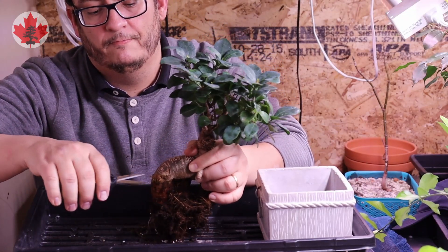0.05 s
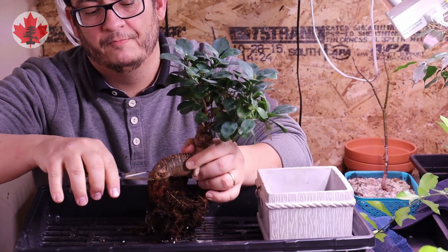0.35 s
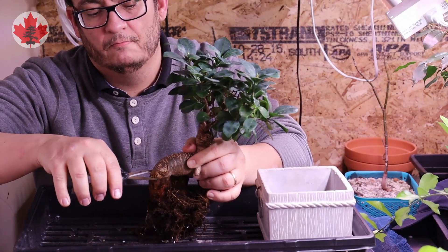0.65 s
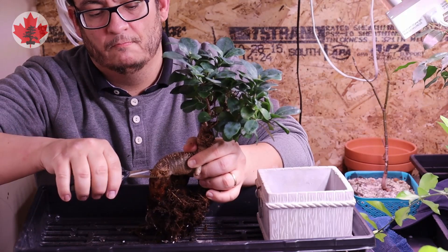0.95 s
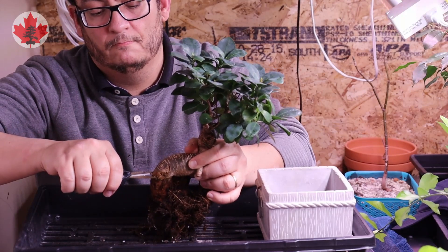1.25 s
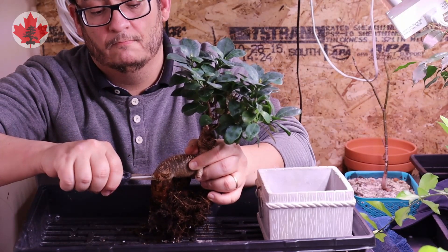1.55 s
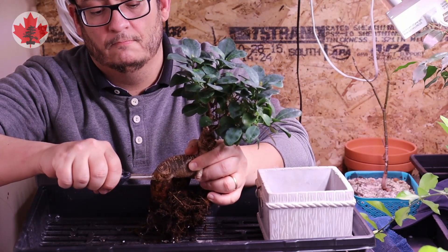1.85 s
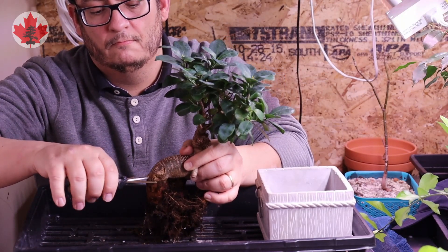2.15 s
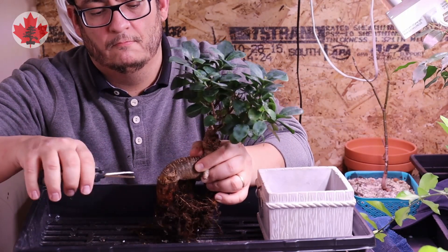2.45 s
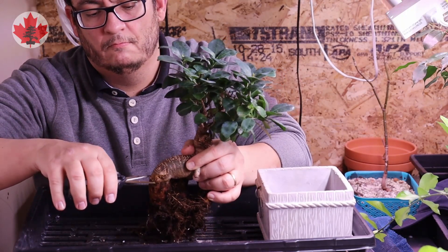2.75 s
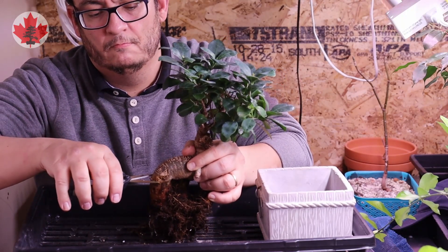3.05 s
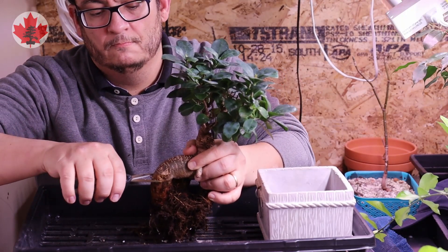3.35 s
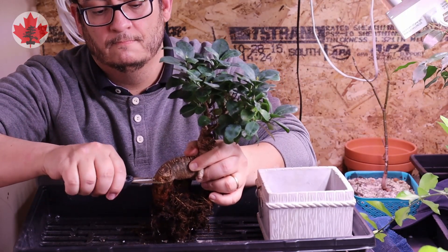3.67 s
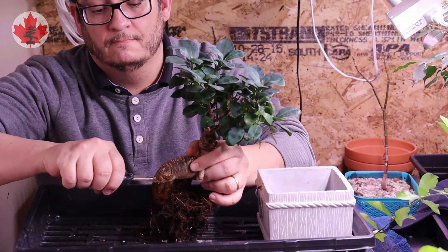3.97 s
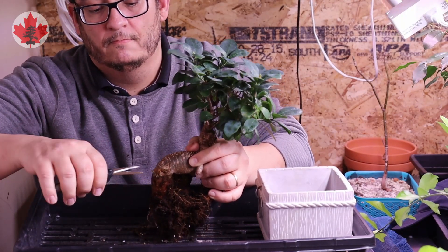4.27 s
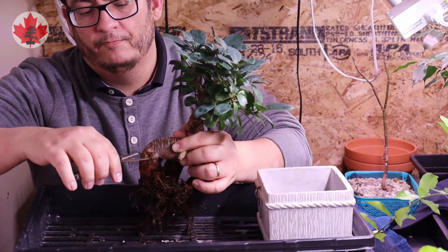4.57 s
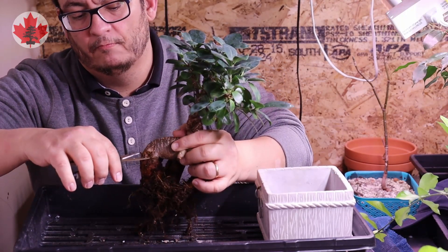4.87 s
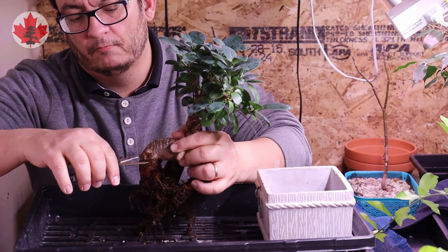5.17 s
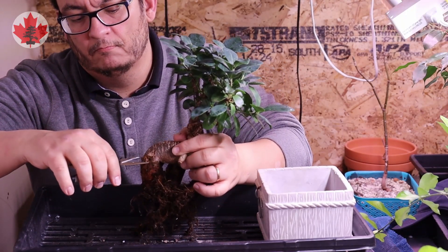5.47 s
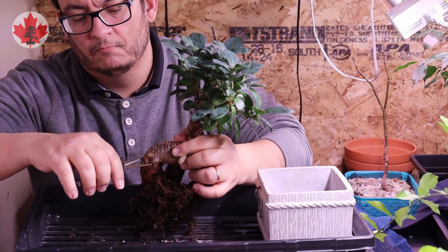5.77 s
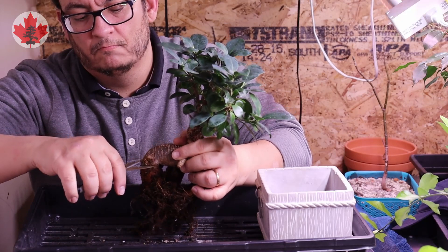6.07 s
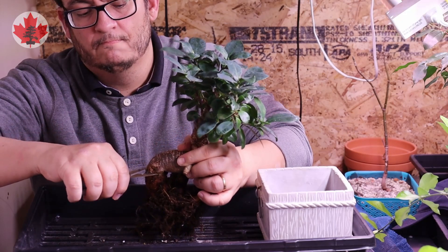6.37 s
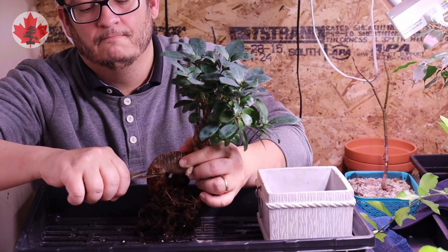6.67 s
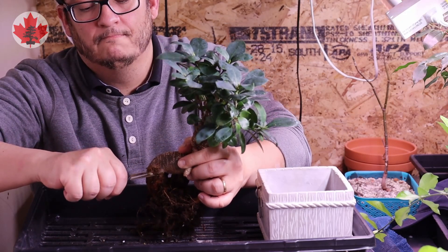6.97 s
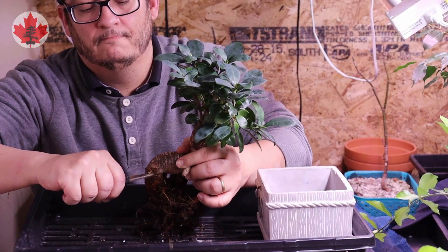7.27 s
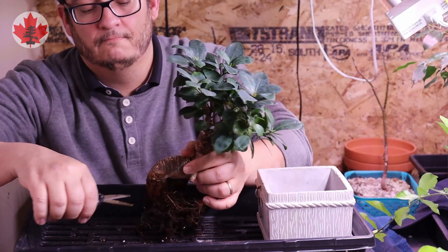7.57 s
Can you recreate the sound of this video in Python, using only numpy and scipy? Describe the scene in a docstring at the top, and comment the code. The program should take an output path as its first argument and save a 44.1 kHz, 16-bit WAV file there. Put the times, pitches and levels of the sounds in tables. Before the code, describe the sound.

A faint mains hum and soft hiss run throughout in a small room. Close by, small steel cutters bite into a thick woody root, each short, dry crack followed by a brief room echo. A sharp double crack comes at about 1.2 seconds and a smaller one at 1.4, with very faint blade ticks on the bark until about 2.7. Another sharp crack at 3.5 seconds is followed by several weaker ones up to 4.3. A lull follows, with only tiny ticks around 5.6. From 6.5 seconds the cracks come quicker and stronger, until at about 7.3 the root parts and the jaws shut with one bright snap, by far the loudest sound, with a short metallic ring. Two small cracks follow at 7.4, and the freed plant shifts with a soft, dull knock at 7.7.

```python
"""At a potting bench in a small room, small steel cutters bite through a thick woody root.
The blades tick on the bark, and fibres crack with each squeeze until the root parts with one
loud snap that rings the cutters and the bench. The freed plant then shifts with a dull knock.
Nearby walls answer each crack; a faint mains hum and a soft hiss lie underneath."""
import sys
import numpy as np
from scipy import signal
from scipy.fft import rfft, irfft
from scipy.io import wavfile
from scipy.ndimage import uniform_filter1d

SR = 44100
rng = np.random.default_rng(int(sys.argv[2]) if len(sys.argv) > 2 else 0)


def to_wav(s):
    """Save 16-bit WAV."""
    ch = np.atleast_2d(s).T  # columns
    pcm = np.round(np.clip(ch, -1, 1) * 32767)  # PCM
    wavfile.write(sys.argv[1], SR, pcm.astype(np.int16))


N = 344862
BLOW_SAMPLES = 2 ** 14  # length of one blow with its echoes
BLOW_TIME_S = np.arange(BLOW_SAMPLES) / SR


def gain(db):
    """Turn decibels into a number to multiply by."""
    return 10 ** (np.asarray(db) / 20)


def unit_energy(sound):
    """Scale a sound so that its squares add up to one."""
    return sound / np.sqrt(np.sum(sound ** 2))


def curve(points, size=BLOW_SAMPLES):
    """Join (pitch_hz, value) points to give a value at every pitch of a spectrum."""
    hz, value = np.transpose(points)
    return np.interp(np.log(np.arange(size // 2 + 1) * SR / size + 1), np.log(hz), value)


# The tones of the hum: pitch_hz, level_db
HUM_TONES = [(60, -68.8), (120, -67.5), (180, -82), (240, -80)]
def mains_hum(waver=.2):
    """Mains electricity hums in a few low tones, each wavering a little in strength."""
    t = np.arange(N) / SR
    turns_s = np.linspace(0, t[-1], num=24)
    hum = 0
    for hz, db in HUM_TONES:
        tone = np.sqrt(2) * gain(db) * np.sin(2 * np.pi * (hz * t + rng.random()))
        hum += tone * (1 + waver * np.interp(t, turns_s, rng.standard_normal(len(turns_s))))
    return hum


# The hiss both ears share (called "mid"): pitch_hz, relative_db
HISS_MID = [(12, -34), (22, -11), (40, -7), (65, -9.5), (90, -5), (140, -6.5), (240, -9.5), (350, -8.5),
            (500, -12.5), (1300, -17), (2600, -21), (4900, -21.5), (7000, -23), (15500, -24)]
# The hiss that differs between the ears (called "side"): pitch_hz, relative_db
HISS_SIDE = [(12, -32), (22, -5), (120, -6.5), (320, -8.5), (600, -10), (1400, -12), (15500, -14)]
def hiss(mid_db=-59, side_db=-62):
    """Room air and microphone hiss make a steady noise, strongest in the bass. Gives mid and side."""
    layers = []
    for spectrum, db in [(HISS_MID, mid_db), (HISS_SIDE, side_db)]:
        noise = irfft(rfft(rng.standard_normal(N)) * gain(curve(spectrum, N)), N)
        layers.append(unit_energy(noise) * np.sqrt(N) * gain(db))
    return np.array(layers)


def tearing(break_s, tear_s, follow_db, fibres_per_s=5000):
    """A bundle of fibres gives way at once; its neighbours follow in a fading run of tiny breaks."""
    burst = unit_energy(rng.standard_normal(BLOW_SAMPLES) * np.exp(-BLOW_TIME_S / break_s))
    breaks = (rng.random(BLOW_SAMPLES) < fibres_per_s / SR) * rng.standard_normal(BLOW_SAMPLES)
    return burst + gain(follow_db) * breaks * np.exp(-BLOW_TIME_S / tear_s)


# The notes of cutters and bench: pitch_hz, relative_db, fade_s (time to fall by 60 dB)
RING_NOTES = [(310, -8, .2), (447, -8, .21), (497, -9, .2), (607, -6, .24), (792, -8, .31), (1113, -7, .23),
              (1236, -3, .22), (1291, -5, .21), (1650, -4, .19), (1734, -5, 0.17), (1862, -1.5, .19),
              (1936, -6, .15), (1968, -5, .17), (2010, -7, .15), (2048, -5, .16), (2120, -6, .16),
              (2182, -5, .17), (2280, -5, .17), (2327, -5, .17), (2443, -6, .16), (2856, -7, .16),
              (2955, -9, .15), (3139, -8, .14), (3474, -5, .14), (3550, -3, 0.16), (5118, -3, .17),
              (5770, -7, 0.1), (8280, -5, .11)]
def ringing():
    """Cutters and bench ring with many fading notes; each blow lands a little differently."""
    phases = rng.uniform(0, 2 * np.pi, len(RING_NOTES))
    ring = 0
    for (hz, db, fade_s), phase in zip(RING_NOTES, phases):
        ring += np.sin(2 * np.pi * hz * BLOW_TIME_S + phase) * gain(db - 60 * BLOW_TIME_S / fade_s)
    return unit_energy(ring)


# How long the room holds each pitch: pitch_hz, fade_s (time to fall by 60 dB)
ROOM_FADES = [(150, .28), (450, .22), (800, .28), (1400, .215), (3700, .19), (9700, .185), (15000, .11)]
def echo_tail(build_s=.0035):
    """Countless echoes blur into a tail that thickens quickly and dies sooner in the treble."""
    noise = rfft(rng.standard_normal(BLOW_SAMPLES))
    tail = 0
    for band_hz, fade_s in ROOM_FADES:
        band = curve([(hz, float(hz == band_hz)) for hz, _ in ROOM_FADES])
        tail += irfft(noise * band) * gain(-60 * BLOW_TIME_S / fade_s)
    return unit_energy(tail * (1 - np.exp(-BLOW_TIME_S / build_s)))


# The first echoes from bench, wall and ceiling: delay_s, relative_db
FIRST_ECHOES = [(.0012, -6.5), (.0023, -4.5), (.0058, -9.5), (.0099, -8.5), (.0113, -8.5), (.0145, -9.5)]
def room(tail_db, side_db=-23):
    """Sound arrives directly, then as echoes. Gives mid and side spectra; the side is mostly treble."""
    mid = gain(tail_db) * echo_tail()
    mid[0] += 1  # the direct sound
    for delay_s, db in FIRST_ECHOES:
        mid[int(delay_s * SR)] += gain(db)
    side = rfft(echo_tail()) * gain(side_db + curve([(2000, -17), (5000, -1), (10000, 4)]))
    return np.array([rfft(mid), side])


def tone_colour(spectrum, tilt_db, wood_hz, wood_db, body_hz=380, body_db=4, half_width_octaves=.7):
    """The dB at each pitch: a sharper break is brighter, the wood resonates, a low boost adds body."""
    hz = np.arange(1, BLOW_SAMPLES // 2 + 2) * SR / BLOW_SAMPLES
    db = curve(spectrum) + tilt_db * np.log2(hz / 2000)
    for centre_hz, boost_db in [(wood_hz, wood_db), (body_hz, body_db)]:
        db += boost_db / (1 + (np.log2(hz / centre_hz) / half_width_octaves) ** 2)
    return db - 10 * np.log10(np.mean(gain(db) ** 2))  # energy of one


def struck_filter(db):
    """A filter with these dB at each pitch that starts at once and rings afterwards."""
    cepstrum = irfft(np.log(gain(db)))
    # move any ringing from before the blow to after it
    cepstrum[1:BLOW_SAMPLES // 2] *= 2
    cepstrum[BLOW_SAMPLES // 2 + 1:] = 0
    return np.exp(rfft(cepstrum))


def blow(spectrum, start_s, level_db, tilt_db, tear_s, wood_hz, wood_db,
         ring_db, tail_db, follow_db, break_s):
    """One burst of tiny breaks rings the cutters and bench and fills the room. Gives mid and side."""
    paths = room(tail_db)
    paths[0] += gain(ring_db) * rfft(ringing())
    heard = rfft(tearing(break_s, tear_s, follow_db)) * paths
    # keep the fine random grain, but let the material set the broad colour
    broad_db = 10 * np.log10(uniform_filter1d(abs(heard[0]) ** 2, size=140))
    heard *= struck_filter(tone_colour(spectrum, tilt_db, wood_hz, wood_db) - broad_db)
    strength = gain(level_db) * np.sqrt(.03 * SR)  # level as if spread over 30 ms
    start = int(start_s * SR)
    track = np.zeros((2, N + BLOW_SAMPLES))
    track[:, start:start + BLOW_SAMPLES] = strength * irfft(heard)
    return track[:, :N]


# The tone colour of a breaking fibre, used for ticks, cracks and knock: pitch_hz, relative_db
FIBRE_COLOUR = [(40, -32), (110, -19), (200, -12), (450, -7), (780, 0), (1100, -2), (2100, 1), (2700, -2.5),
                (3200, -3), (4200, -9), (5100, -6), (7000, -13), (10800, -11), (13000, -22), (15500, -29)]
# Each touch of the blades on the bark: start_s, level_db
BLADE_TOUCHES = [(.045, -66), (1.316, -62), (1.599, -63), (2.092, -61.5), (2.114, -58), (2.68, -61),
                 (4.223, -58.5), (5.7749, -62), (6.5037, -59), (6.853, -57)]
def bark_ticks():
    """The blades catch on the bark with faint, bright ticks."""
    return sum(blow(FIBRE_COLOUR, start_s, level_db, tilt_db=2.4, tear_s=.004, wood_hz=3200, wood_db=3,
                    ring_db=-9, tail_db=3, follow_db=-5, break_s=.002)
               for start_s, level_db in BLADE_TOUCHES)


# Each crack of the root: start_s, level_db, tilt_db (per octave; more is brighter),
# tear_s (tearing time), wood_hz (pitch of the splitting fibre), wood_db (boost at that pitch)
ROOT_CRACKS = [(1.1487, -45.5, -1.3, .0005, 2200, 2), (1.1627, -34.3, 0, .002, 11000, 8.5),
               (1.4273, -46.4, 2.7, .0015, 880, 6), (2.5866, -55.5, -4.5, .001, 3280, 15),
               (3.506, -37.2, 0, .0003, 600, 2), (3.5539, -47.5, -1.6, .006, 11000, 10),
               (3.7595, -48.4, -1.2, .006, 9200, 6), (4.1331, -49.8, 4, .001, 1450, 4),
               (4.245, -54, 1, .007, 1200, 3), (5.5524, -59, -2, .002, 2930, 13),
               (6.5282, -56, -4, .004, 3400, 12), (6.638, -44, .7, .004, 3100, 6),
               (6.7693, -41.4, -1.3, .001, 3250, 14.5), (6.9175, -38, 1.8, .003, 2400, 6),
               (6.9265, -45, 2, .003, 1750, 9), (7.0365, -50.5, 3.2, .001, 2300, 4),
               (7.3807, -49, -1, .003, 4800, 10), (7.4211, -50.3, 1.4, .009, 1100, 3)]
def root_cracks():
    """Each squeeze splits some of the root's fibres with short, dry cracks."""
    return sum(blow(FIBRE_COLOUR, *crack, ring_db=-10, tail_db=2, follow_db=-7, break_s=.0012)
               for crack in ROOT_CRACKS)


# The tone colour of the closing jaws: pitch_hz, relative_db
JAW_COLOUR = [(40, -40), (150, -11), (300, -5), (600, -3), (780, -9), (1240, 3), (1480, -4), (1720, 3.5),
              (2250, 4.5), (2600, -4), (3400, -1), (4100, -11), (5200, -6), (6500, -13), (8100, -11),
              (9200, -20), (10800, -15), (13500, -30), (15500, -33)]
def final_snap():
    """The root parts and the steel jaws slam shut."""
    return blow(JAW_COLOUR, start_s=7.2633, level_db=-21.4, tilt_db=.5, tear_s=.002,
                wood_hz=1990, wood_db=2, ring_db=-12, tail_db=.5, follow_db=-6, break_s=.0014)


def plant_knock():
    """The freed plant shifts: a slower blow with little treble, heard as a dull knock."""
    return blow(FIBRE_COLOUR, start_s=7.707, level_db=-53, tilt_db=-3.5, tear_s=.012,
                wood_hz=1100, wood_db=2, ring_db=-9, tail_db=4, follow_db=-4, break_s=.006)


def scene():
    """Lay the cutting over hum and hiss, then turn mid and side into left and right."""
    cutting = root_cracks() + bark_ticks() + final_snap() + plant_knock()
    hum = mains_hum()
    mid, side = cutting + hiss()
    return np.array([mid + side, mid - side]) + hum


def record(dry, top_hz=15800):
    """Cut away the very highest treble."""
    return signal.sosfilt(signal.ellip(10, .1, 70, top_hz, fs=SR, output="sos"), dry)


dry = scene()
out = record(dry)
to_wav(out)
```